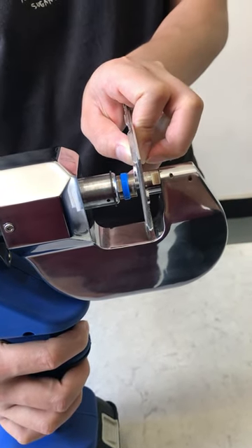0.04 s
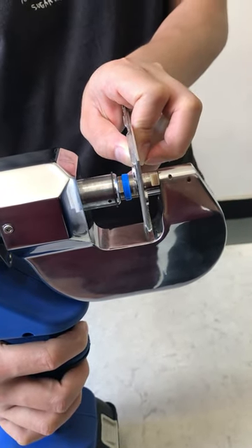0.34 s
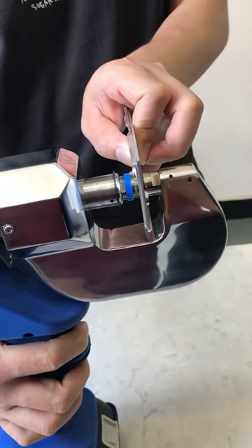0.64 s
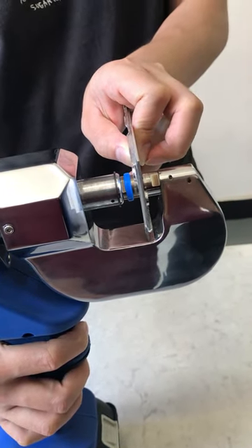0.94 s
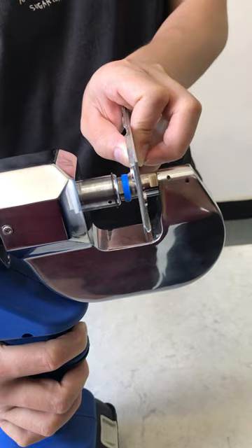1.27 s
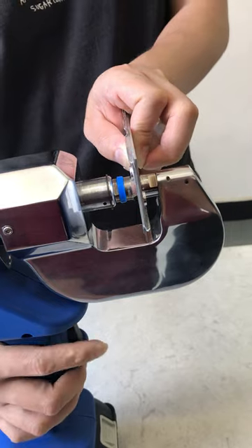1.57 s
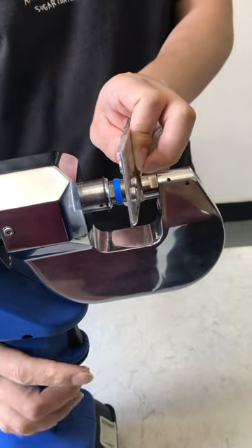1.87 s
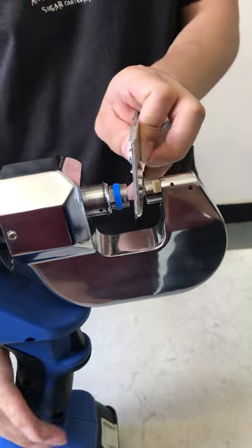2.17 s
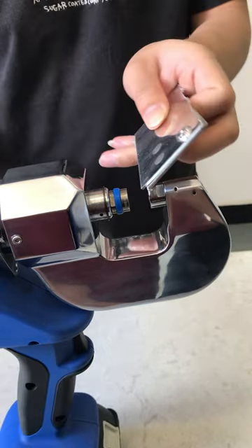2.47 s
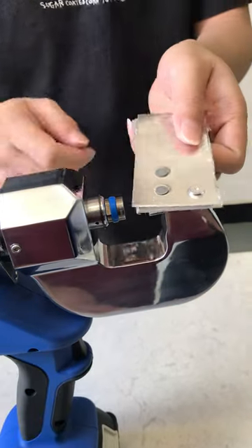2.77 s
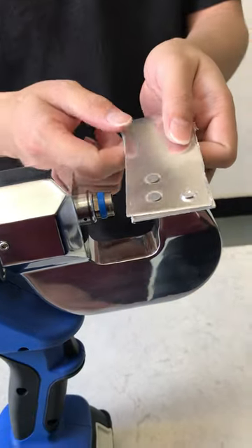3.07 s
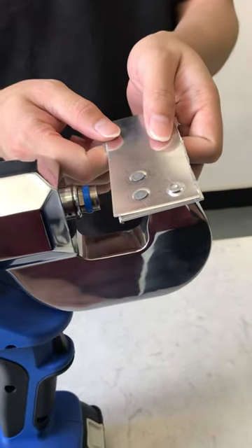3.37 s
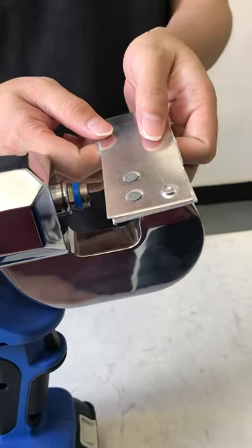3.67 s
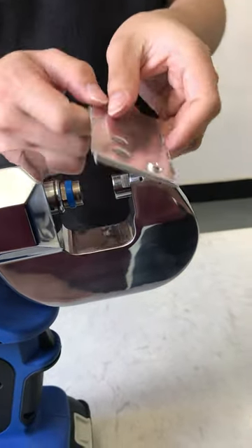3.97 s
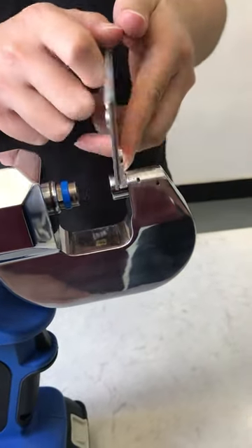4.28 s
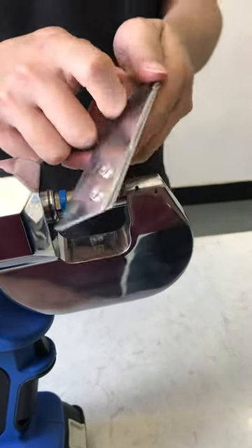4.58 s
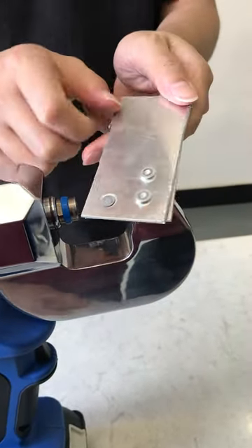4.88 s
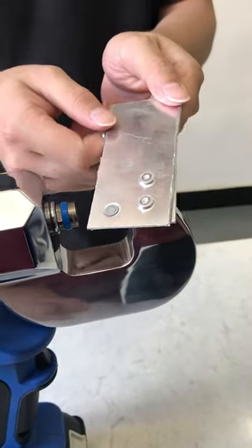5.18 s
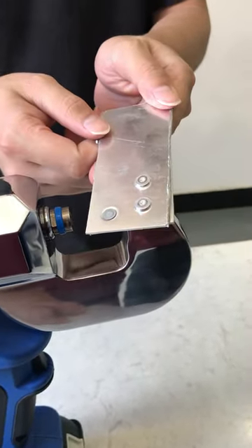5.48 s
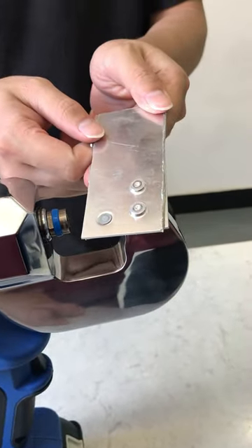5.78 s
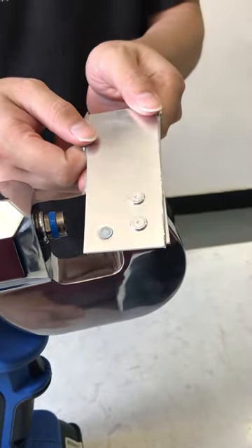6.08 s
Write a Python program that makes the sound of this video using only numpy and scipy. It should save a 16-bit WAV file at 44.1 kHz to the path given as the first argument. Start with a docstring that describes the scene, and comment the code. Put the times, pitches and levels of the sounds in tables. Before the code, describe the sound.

A cordless rivet press starts right away with a harsh, fast pulsing buzz, its motor labouring and then braking suddenly. A few light clicks follow as the riveted metal plates are taken from the jaw, and a couple of seconds later they clink several more times while being turned. The tool and plates are near the microphone; behind them the workshop has a low ventilation hum and a faint swelling hiss.

```python
"""A workshop, one microphone close to a cordless rivet press as it sets a rivet. Motor and gears drive
a piston pump, about 23 strokes a second; each stroke drags the gear whine down, rasps and lets go with
a knock. Then the motor brakes and the room rings out. The riveted plates click against the steel jaw
as they are taken out and turned. Farther off: ventilation rumble, a swelling hiss and a faint whine."""
import sys
import numpy as np
from scipy import signal
from scipy.fft import rfft, irfft, next_fast_len
from scipy.io import wavfile
from scipy.ndimage import uniform_filter1d, map_coordinates

SR = 44100
rng = np.random.default_rng(int(sys.argv[2]) if len(sys.argv) > 2 else 0)


def persist_wave(psi):
    """Save psi, clipped to +-1, as 16-bit WAV."""
    counts = np.round(np.clip(psi, -1, 1) * 32767).astype(np.int16)
    wavfile.write(sys.argv[1], SR, np.atleast_2d(counts).T)


N = 279153

TURNS_PER_STROKE, GEAR_TEETH, FIRST_STROKE_S = 14, 13, .0368
BRAKE_S, BRAKE_HZ_PER_S, BRAKE_DB_PER_S = 1.28, 3500, 618.5

# The motor, close up, labouring as the rivet sets and then running free.
# Each row: time in seconds, mean turns a second, stroke level in dB.
MOTOR = [(0, 339, -20.5), (.45, 327.8, -18.5), (.53, 312.4, -18), (.7, 311, -16), (.9, 287.8, -16.5),
         (1.08, 289.4, -16), (1.14, 253.2, -17), (1.2, 321.4, -23.5), (1.27, 334.6, -23.5)]

def press():
    """The motor is dragged down in each pump stroke, catches up between strokes and is braked at the end."""
    t = clock()
    mean_hz, load_db = curves(MOTOR)
    strokes, period, force = pump(mean_hz, load_db)
    braking_s = np.maximum(t - BRAKE_S, 0)
    sag = .23 * amp(3 * (load_db - load_db.max()))  # share of speed lost, growing as the load cubed
    drag = stroke_shape(strokes + .005, .0065, .003, np.ones(len(force)))
    drag -= drag[t < BRAKE_S].mean()
    speed_hz = np.maximum(mean_hz - BRAKE_HZ_PER_S * braking_s, 0) * (1 - sag * drag)
    turns = np.cumsum(speed_hz * (1 + .012 * wobble(150))) / SR
    running = amp(-27.5 - BRAKE_DB_PER_S * braking_s)
    effort = drive_effort(strokes, period, force, running)
    drive = gears(turns, effort) + gear_mesh(turns, strokes, force, sag)
    return drive + piston(strokes, force) + seal() + running * rotor(turns, sag, load_db)

def pump(mean_hz, load_db):
    """The geared-down motor drives the pump until it brakes: stroke times, cycle lengths and forces."""
    t = clock()
    cycles = np.cumsum(mean_hz) / SR / TURNS_PER_STROKE
    first, last = np.interp([FIRST_STROKE_S, BRAKE_S], t, cycles)
    times = np.interp(np.arange(first, last), cycles, t)
    force = amp(np.interp(times, t, load_db) + .75 * rng.standard_normal(len(times)))
    return times, TURNS_PER_STROKE / np.interp(times, t, mean_hz), force

def drive_effort(strokes, period, force, running):
    """The drive snaps out of its slack, pushes to peak pressure and rattles on the way back."""
    slack = stroke_shape(strokes - .0085, .001, .007, force, steep=2)
    load = stroke_shape(strokes, .006, .007, force, steep=1.5)
    rebound_force = force * amp(rng.normal(-6, .5, len(force)))
    rebound = stroke_shape(strokes + .2933 * period, .0057, .0039, rebound_force, steep=2.5)
    return np.sqrt((amp(-2) * running) ** 2 + (amp(-6) * slack) ** 2 + load ** 2 + rebound ** 2)

# The rasp of gears and valve, close up. Each row: frequency in Hz, relative level in dB.
RASP = [(300, -24.5), (500, -35.5), (800, -16.5), (1400, -7), (1650, -8.5), (1850, -14.5), (2100, -4),
        (3200, -3.5), (3950, 5), (4600, -9.5), (7000, -11.5), (9200, -16.5), (10400, -23), (12000, -20.5),
        (15800, -25.5)]

def gears(turns, effort):
    """Teeth strike harder under load and the shaft's play ticks once a turn; both ring the housing."""
    chatter = impacts(GEAR_TEETH * turns + .12 * wobble(2500), scatter_db=6)
    ticks = impacts(turns + .1 * wobble(300), scatter_db=5.5)
    ring = filtered(effort * (amp(-11) * chatter + amp(-6.5) * ticks + amp(-8) * noise()), housing)
    rasp = filtered(effort * (amp(-1) * noise() + amp(-7.5) * ticks), colour(RASP))
    return ring + rasp

# The gear housing's resonances. Each row: frequency in Hz, width in Hz, relative level in dB.
HOUSING = [(1109, 275.5, -3), (1641.4, 70, 0.5), (2210, 110, -9.5), (2900, 57, -11.5), (3550, 88, -3),
           (4019, 230, 3), (5172, 130, -13), (6100, 210, -13.5), (6540, 290, -10.5), (7020, 44, -8),
           (8450, 240, -13.5), (9800, 140, -20), (11440, 380, -19), (13200, 160, -20.5)]

def housing(hz):
    """The housing responds as a bank of resonators of alternating sign."""
    modes = ((-1) ** k * amp(db) * 1j * hz * width / (centre ** 2 - hz ** 2 + 1j * hz * width)
             for k, (centre, width, db) in enumerate(HOUSING))
    return unit_power(sum(modes))

def gear_mesh(turns, strokes, force, sag):
    """The meshing teeth sing as pressure builds, and sink in pitch as the motor is dragged down."""
    squeeze = np.sqrt(sag) * stroke_shape(strokes - .0015, .005, .0045, force, steep=2)
    return amp(5.5) * squeeze * amp(1.8 * wobble(200)) * np.sin(2 * np.pi * GEAR_TEETH * turns)

# The piston's knock, close up. Each row: frequency in Hz, relative level in dB.
KNOCK = [(100, -40), (500, -37.5), (720, -21), (950, -4.5), (1150, 0.5), (1400, -8.5), (1900, -9),
         (2600, -12.5), (4500, -20.5), (12000, -48)]

def piston(strokes, force):
    """The piston thuds through each stroke and cracks as the valve lets go; the brake adds one clunk."""
    thud_force = force * amp(rng.normal(-8, 1.24, len(force)))
    thud = stroke_shape(strokes + .001, .009, .01, thud_force, steep=2)
    clunk = stroke_shape([BRAKE_S + .011], .009, .01, [amp(-28)], steep=1.9)
    valve = stroke_shape(strokes + .0018, .00053, .002, force)
    knock = filtered((thud + clunk) * noise(), colour(KNOCK))
    return knock + filtered(amp(3.5) * valve * noise(), colour(RASP))

# Squeaks from inside the press. Each row: peak time in seconds, pitch in Hz, level in dB.
SQUEAKS = [(1.027, 5950, -28), (1.078, 5950, -26.5), (1.127, 6160, -24.5)]

def seal():
    """The piston seal squeaks on the last hard return strokes."""
    t = clock()
    return sum(amp(db) * np.exp(-((t - s) / .005) ** 2) * np.sin(2 * np.pi * hz * t + wobble(500))
               for s, hz, db in SQUEAKS)

def rotor(turns, sag, load_db):
    """The rotor hums and whines most when it spins freely; its fan hisses."""
    phase = 2 * np.pi * turns
    strain_db = load_db - load_db.min()
    hum = amp(-16.5 - 16 * sag + 2.5 * wobble(60)) * (np.sin(phase) + amp(-7) * np.sin(2 * phase))
    low_whine = amp(-12 - 18 * sag) * np.sin(5 * phase)
    high_whine = amp(-9 - 1.1 * strain_db) * np.sin(15 * phase)
    whine = (low_whine + high_whine) * amp(3.4 * wobble(40))
    fan_colour = colour([(500, -20), (2000, -.5), (8000, -4), (10400, -4.5), (15000, -5.5)])
    return hum + whine + amp(-9) * filtered(noise(), fan_colour)

# Plate meets jaw, near the microphone. Each row: start in seconds, levels of the crack,
# the plate's ring and the jaw's ring in dB, contact length in seconds.
CONTACTS = [(1.5114, -36, -59.5, -33, .004), (1.8452, -47, -56, -53, .006), (1.909, -35.5, -61, -47, .003),
            (3.9025, -53, -61.5, -64, .004), (4.3932, -47, -62.5, -55.5, 0.0077),
            (4.4267, -27, -40, -50, .0022), (4.4946, -29.5, -32, -48, 0.0039),
            (4.571, -39, -46.5, -51, 0.0036), (4.607, -58, -53.5, -72, 0.013), (4.636, -56, -45, -56, .016)]
# The modes of the plates and of the steel jaw.
# Each row: frequency in Hz, relative level in dB, seconds to fall by 60 dB.
PLATE_MODES = [(2435, -20, .055), (3797, -7.5, 0.068), (4200, -0.5, 0.022), (4540, -4, 0.0186),
               (5097, -5, 0.027), (8906, -8, 0.0275), (10900, -1, 0.0177), (13516, -4, .016),
               (15100, -5, 0.0191)]
JAW_MODES = [(1010, 4, 0.0192), (1528, 0, 0.0225), (3925, 2.5, .016), (5554, -1.5, 0.0156),
             (6350, 3.5, 0.0135), (9950, 1, 0.0087), (14700, -7, .02)]

def plates(bright_hz=12000):
    """Each contact is a brief scrape of metal on metal; fingers damp the ringing and shift its pitch."""
    out, t = np.zeros(N + SR), np.arange(SR // 4) / SR
    highpass = signal.butter(4, 3500, "high", fs=SR, output="sos")
    lowpass = signal.butter(1, bright_hz, fs=SR)
    for start, crack_db, plate_db, jaw_db, length in CONTACTS:
        scrape = rng.standard_normal(len(t)) * np.exp(-(t / length) ** 2)
        hit = amp(crack_db) * signal.sosfilt(highpass, scrape)
        attack = 1 - np.exp(-t / (.095 * length))
        for modes, ring_db in ((PLATE_MODES, plate_db), (JAW_MODES, jaw_db)):
            for hz, mode_db, t60 in modes:
                decay = amp(ring_db + 2.5 + mode_db + rng.normal(0, 1.7) - 60 * t / t60)
                hit += attack * decay * np.sin(2 * np.pi * (hz * rng.normal(1, .011) * t + rng.random()))
        out[round(start * SR):][:len(t)] += signal.lfilter(*lowpass, hit)
    return out[:N]

# How long the workshop rings. Each row: frequency in Hz, seconds to fall by 60 dB.
ROOM_DECAY = [(200, 0.53), (1000, 1), (3500, 1), (7000, 0.88), (14000, 0.74)]
# The colour of its tail at the microphone. Each row: frequency in Hz, relative level in dB.
TAIL_COLOUR = [(300, 10), (1000, -1), (2800, -1), (3400, -3.5), (3950, -12.5), (4600, -4.5), (8000, -2.5),
               (14000, -6.5)]

def room(x, early_db, tail_db):
    """After the direct sound, near surfaces give a few quick copies and the hall a long dull tail."""
    hz, t, spectrum = signal.stft(rng.standard_normal(SR), SR, nperseg=256)
    decay = amp(along(TAIL_COLOUR, hz)[:, None] - 60 * t / along(ROOM_DECAY, hz)[:, None])
    tail = signal.istft(spectrum * decay, SR, nperseg=256)[1]
    tail *= 1 - np.exp(-np.arange(len(tail)) / SR / .009)
    delays = (SR * rng.uniform(.002, .015, size=8)).astype(int)
    early = np.bincount(delays, rng.standard_normal(len(delays)), len(tail))
    echoes = amp(early_db) * early / np.linalg.norm(early) + amp(tail_db) * tail / np.linalg.norm(tail)
    return x + signal.fftconvolve(x, echoes)[:N]

# The workshop's room tone. Each row: frequency in Hz, relative noise density in dB.
AIR = [(15, -41), (25, -16), (48, -4), (113, -0.5), (152, -6.5), (204, -4.5), (233, -8.5), (389, -16.5),
       (582, -24), (648, -18), (1270, -19.5), (1410, -23.5), (3440, -31), (7910, -43.5), (15500, -57.5)]

def ventilation():
    """Ventilation rumbles almost steadily over a trace of white noise."""
    return amp(-45 + .505 * wobble(5)) * unit(filtered(noise(), colour(AIR))) + amp(-86) * noise()

# A hiss well back from the microphone. Each row: frequency in Hz, relative level in dB.
HISS = [(500, -3.5), (1500, -13), (3000, 1.5), (6000, 0.5), (8000, -8), (10000, -16.5), (12500, -15),
        (15500, -18)]

def far_hiss(period_s=.716):
    """A hiss swells and fades regularly, like a distant cycling machine."""
    since = (clock() - 2.39) % period_s
    swell = (1 - np.exp(-(since / .15) ** 2)) * np.exp(-(since / .42) ** 2)
    return amp(-57.5 + wobble(4.5)) * swell * unit(filtered(noise(), colour(HISS)))

# A faint whine in the distance. Each row: frequency in Hz, level in dB.
WHINE = [(576.0, -59), (963.6, -72), (1491, -69)]

def far_whine():
    """Three wavering tones, barely there until they rise near the end."""
    t = clock()
    fade = np.interp(t, [5.76, 5.85, 6.05, 6.33], [.25, .924, 1, .53])
    tones = sum(amp(db + 3.8 * wobble(21)) * np.sin(2 * np.pi * hz * t + wobble(35)) for hz, db in WHINE)
    return fade * np.sqrt(2) * tones

def stroke_shape(times, rise, fall, gains, steep=1):
    """A swell around each time, rise and fall in seconds; steep flanks give it a fuller core."""
    out, t = np.zeros(N), clock()[:2 * SR]
    for s, gain in zip(times, gains):
        out[:len(t)] += gain * np.exp(-np.maximum((s - t) / rise, (t - s) / fall) ** steep)
    return out

def impacts(cycles, scatter_db):
    """One blow of random size per cycle, about unit power while running."""
    at = np.flatnonzero(np.diff(np.floor(cycles)) > 0)
    sizes = unit(amp(scatter_db * np.clip(rng.standard_normal(len(at)), -2, 2)))
    return np.bincount(at, sizes * np.sqrt(np.gradient(at)), N)

def amp(db):
    return 10 ** (np.asarray(db) / 20)

def unit(x):
    return x / np.sqrt(np.mean(x ** 2) + 1e-20)

def unit_power(response):
    return response / np.sqrt(np.mean(np.abs(response) ** 2))

def clock():
    return np.arange(N) / SR

def noise():
    return rng.standard_normal(N)

def wobble(rate):
    """A smooth random curve, rate knots a second."""
    return map_coordinates(rng.standard_normal(int(N * rate / SR) + 4), [np.arange(N) * rate / SR])

def along(points, hz):
    """Interpolate (Hz, value) points on a log frequency axis."""
    knots_hz, values = np.transpose(points)
    return np.interp(np.log(hz + 1), np.log(knots_hz + 1), values)

def curves(rows):
    """One value per sample for each column after the time."""
    times, *columns = np.transpose(rows)
    return [np.interp(clock(), times, column) for column in columns]

def filtered(x, response):
    """Pass x through a complex response of frequency."""
    size = 2 * next_fast_len((N + SR // 2) // 2)
    return irfft(rfft(x, size) * response(np.fft.rfftfreq(size, 1 / SR)), size)[:N]

def colour(points):
    """Causal response with a (Hz, dB) shape and unit power."""
    def response(hz):
        cepstrum = irfft(np.log(amp(along(points, hz))))
        half = len(cepstrum) // 2
        return unit_power(np.exp(rfft(np.r_[cepstrum[0], 2 * cepstrum[1:half]], 2 * half)))
    return response

def gain_control(x, threshold_db, slope, release_db_per_s):
    """Loud sound pulls the gain down quickly; it recovers at a steady rate."""
    level_db = 10 * np.log10(np.abs(uniform_filter1d(x * x, size=2048)) + 1e-12)
    recovery = release_db_per_s * clock()
    cut_db = np.maximum.accumulate(slope * np.maximum(level_db - threshold_db, 0) + recovery) - recovery
    return x * amp(-uniform_filter1d(cut_db, size=512))

def scene():
    """Press and plates close to one microphone, the workshop behind them."""
    tool = amp(6) * room(press(), early_db=-19.5, tail_db=-18)
    handling = room(plates(), early_db=-25, tail_db=-15.5)
    return (tool + handling + ventilation() + far_hiss() + far_whine())[None]

def record(dry):
    """The recorder turns loud sound down, rounds off its peaks and keeps nothing above its band limit."""
    ceiling, top_hz = .72, 15830
    x = gain_control(dry[0], threshold_db=-26, slope=.355, release_db_per_s=12.5)
    x = x / (1 + (x / ceiling) ** 6) ** (1 / 6)
    return filtered(x, lambda hz: hz < top_hz)[None]

dry = scene()
out = record(dry)
persist_wave(out)
```